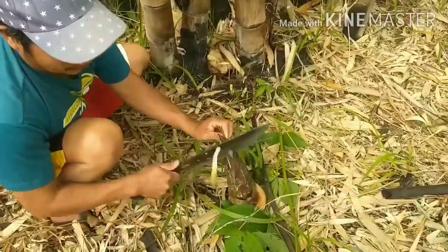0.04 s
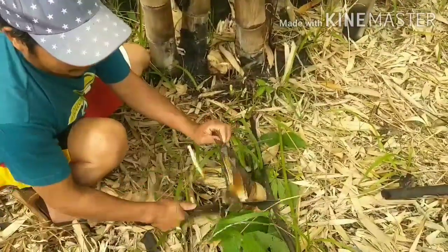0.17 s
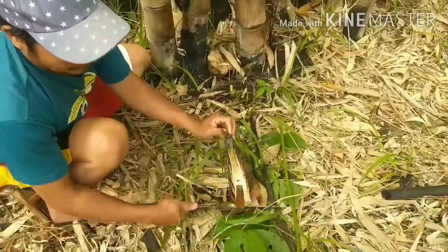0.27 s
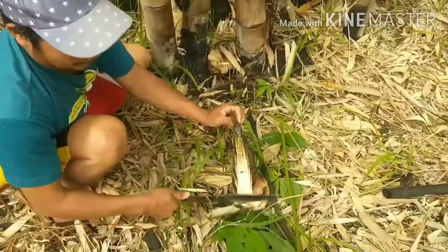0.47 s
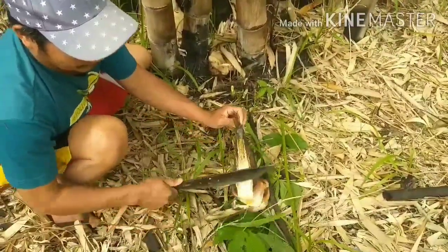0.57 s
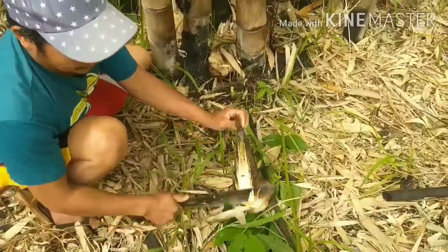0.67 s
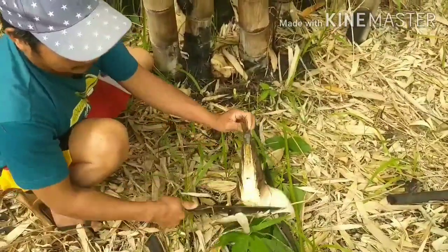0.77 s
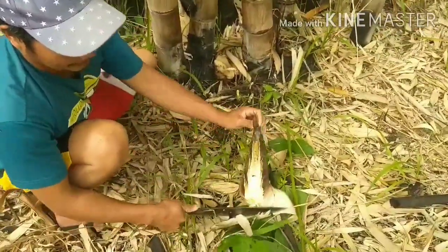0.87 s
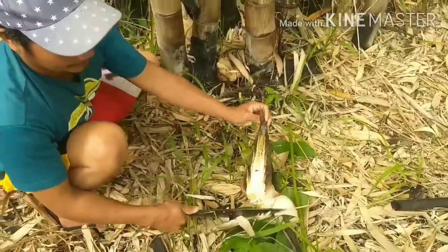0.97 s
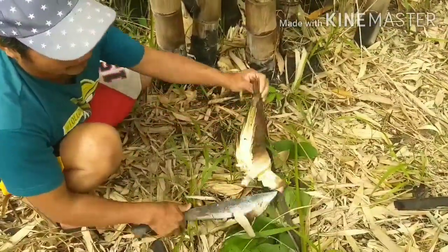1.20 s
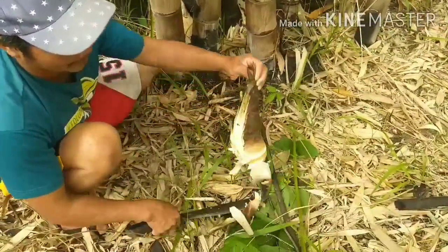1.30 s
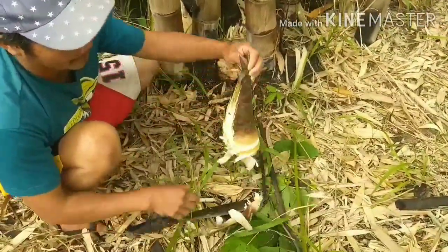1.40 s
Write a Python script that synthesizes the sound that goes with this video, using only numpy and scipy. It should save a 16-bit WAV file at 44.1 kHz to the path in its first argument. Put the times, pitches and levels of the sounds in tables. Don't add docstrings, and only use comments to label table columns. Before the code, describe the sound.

Close outdoor sound of a blade slicing a tough shoot, one loud crackling tear trailing into a shave, a quieter bright second cut, then sparse snaps and papery litter rustling over very faint air.

```python
import sys
import numpy as np
from scipy import signal
from scipy.fft import rfft, irfft, next_fast_len
from scipy.io import wavfile
from scipy.ndimage import uniform_filter1d, map_coordinates

SR = 44100
rng = np.random.default_rng(int(sys.argv[2]) if len(sys.argv) > 2 else 0)


def decibels_to_gain(level_db):
    exponent = np.asarray(level_db, float) / 20
    return 10 ** exponent


def persist_wave(psi):
    counts = np.round(np.clip(psi, -1, 1) * 32767).astype(np.int16)
    wavfile.write(sys.argv[1], SR, np.atleast_2d(counts).T)


N = 63945
TIME = np.arange(N) / SR


def unit(x):
    return x / np.sqrt(np.mean(x ** 2) + 1e-20)


def filtered(x, response):
    m = next_fast_len(N + 8192)
    hz = np.fft.rfftfreq(m, 1 / SR)
    return irfft(rfft(x, m) * response(hz), m)[..., :N]


def gain_curve(hz, points):
    point_hz, db = np.transpose(points)
    return decibels_to_gain(np.interp(np.log(hz + 1), np.log(point_hz + 1), db))


def coloured(x, points):
    return unit(filtered(x, lambda hz: gain_curve(hz, points)))


def peak(f, hz, width_hz):
    return width_hz * 1j * f / (hz * hz - f * f + 1j * f * width_hz)


def wobble(rate_hz):
    knots = rng.standard_normal(int(N / SR * 400) + 4)
    return map_coordinates(knots, [TIME * rate_hz])


def crackle(clump_db, patchy_db):
    grains_per_s, spike_db, biggest_db, grain_share = 6000, 3, 11.5, 0.53
    chance, sign, size = rng.random((3, N))
    size_db = np.minimum(-spike_db * np.log(size + 1e-9), biggest_db)
    breaks = (chance < grains_per_s / SR) * np.sign(sign - 0.5) * decibels_to_gain(size_db)
    hiss = rng.standard_normal(N)
    x = np.sqrt(grain_share) * unit(breaks) + np.sqrt(1 - grain_share) * hiss
    z = signal.stft(x, nperseg=128)[2]
    patches = uniform_filter1d(rng.standard_normal(z.shape), size=4, axis=0)
    patches = uniform_filter1d(patches, size=4, axis=1)
    x = signal.istft(z * decibels_to_gain(patchy_db * unit(patches)), nperseg=128)[1][:N]
    return unit(x * decibels_to_gain(clump_db * (wobble(60.99) + wobble(250))))


def place(out, s, sound):
    return out + np.pad(sound, (round(s * SR), N))[:N]


# (time [s], effort [dB], depth of cut [dB over effort], brightness [dB over effort])
PLACING = [
    (0, -47.5, -15, 3),
    (0.044, -44.5, -19.5, 0),
    (0.068, -44, -11, -10),
    (.1, -48, -23, 7),
    (.125, -54.5, -22, 17),
    (.135, -56.5, -13, 3),
    (.165, -53.5, -25, 17),
    (.192, -42, -21.5, 0.5),
    (0.204, -33, -15, 8.5),
]
CUT_1 = [
    (0.207, -15.5, -40, 10.5),
    (0.211, -8.5, -39.5, -18),
    (0.227, -13, -12.5, 5),
    (0.238, -16.5, -29, 1.5),
    (0.243, -21.5, -5.5, 1),
    (0.268, -19, -17, -12),
    (0.309, -28.5, -13.5, -3),
    (.41, -28.5, -15, 2.5),
    (0.427, -38, -15.5, 5),
]
RETURN = [
    (.448, -31.5, -12.5, 0.018),
    (0.461, -39.5, -19, 0.53),
    (.53, -39, -16.5, 0.038),
    (.6, -42, -24, 1),
    (.64, -42.5, -41, -1.6),
    (.667, -48.5, -34, -2),
    (.674, -44, -34, -1),
]
CUT_2 = [
    (.677, -33, -45, -8.5),
    (0.692, -34.5, -37.5, 1),
    (0.694, -26, -50, -4),
    (.72, -23.5, -27, 10),
    (.745, -25, -24.5, 1.5),
    (0.759, -26.5, -6, 9),
    (.763, -29, -10.5, 5),
    (0.789, -27.5, -13.5, -2.5),
    (.83, -29.5, -21.5, -5),
]
LIFTING = [
    (.89, -38, -14.5, 1.5),
    (.97, -42, -20.5, -5),
    (1.05, -41, -15, 3.5),
    (1.15, -44.5, -24.5, 2.5),
    (1.243, -44, -17, 4),
    (1.257, -38, -24, 8.5),
    (1.29, -41, -15.5, 2),
    (1.329, -33.5, -16.5, 3),
    (1.385, -35, -20.5, 6),
    (1.45, -42.5, -17, 4.5),
]


def controls():
    s, *columns = np.transpose(PLACING + CUT_1 + RETURN + CUT_2 + LIFTING)
    return [np.interp(TIME, s, column) for column in columns]


# (frequency [Hz], level [dB per Hz])
FIBRE_COLOUR = [(500, -37), (1200, -16.5), (2300, -5.5), (3600, 1.5), (4900, 3), (6200, -10), (16000, -23)]
# (frequency [Hz], level [dB per Hz])
FIZZ_COLOUR = [(3000, -43), (6200, -17), (8000, 3), (9300, -0.5), (10200, -10), (12000, 4), (13500, -9.5),
               (15700, -9.5)]
# (frequency [Hz], level [dB per Hz])
FLESH_COLOUR = [(40, -40), (90, -18), (250, -16), (500, -13.5), (900, -1.5), (1900, -1.5), (3000, -12)]


def tearing():
    effort_db, depth_db, bright_db = controls()
    fibres = crackle(clump_db=0.0, patchy_db=2.0)
    rasp = decibels_to_gain(-6.0) * coloured(fibres, FIBRE_COLOUR)
    fizz = decibels_to_gain(bright_db - 8.5) * coloured(fibres, FIZZ_COLOUR)
    flesh = decibels_to_gain(depth_db) * coloured(crackle(clump_db=1.2, patchy_db=1.2), FLESH_COLOUR)
    return decibels_to_gain(effort_db) * (rasp + fizz + flesh)


# (time [s], peak level [dB], pitch [Hz], decay t60 [s])
STRAND_BREAKS = [(0.0542, -19, 7500, 0.015), (0.0545, -18, 3650, 0.0118), (0.054, -33, 2450, 0.017),
                 (0.068, -39, 4800, .02), (.044, -51, 2900, 0.0182), (0.2008, -22, 8700, .01),
                 (.2053, -22, 7800, .01), (0.208, -11, 11800, 0.017), (.2215, -7.5, 11820, .015),
                 (0.2085, -4.5, 8200, 0.011), (0.2109, -5.5, 4200, 0.014), (.2135, -4.5, 3480, 0.01),
                 (0.2152, -7, 3000, 0.013), (0.221, -4, 3100, 0.0087), (0.2236, -14, 1900, 0.0084),
                 (.2245, -8.5, 3500, 0.028), (.2305, -24, 4600, .012), (.2365, -17.5, 2600, 0.0066),
                 (.249, -22.5, 2100, 0.0092), (.263, -20, 3300, 0.022), (0.4419, -17.5, 3573, 0.0071),
                 (.507, -31.5, 9300, 0.0165), (.619, -34, 3360, .006), (0.6764, -25.5, 3290, 0.022),
                 (.6935, -21, 3600, 0.015), (.6985, -15.5, 9100, .012), (0.6998, -31, 3300, 0.0107),
                 (0.7032, -19, 3300, 0.014), (.712, -16, 7580, 0.0246), (0.76, -13.5, 3350, 0.021),
                 (0.7186, -13, 10500, .003), (0.7198, -20, 3900, 0.0088), (0.7241, -13, 7580, .02),
                 (0.7563, -21.5, 2072, 0.016), (0.736, -26, 3200, 0.01), (0.7513, -20, 3600, 0.023),
                 (.823, -27, 4720, 0.0156), (.905, -25, 8260, 0.0049), (1.171, -38.5, 3800, .015),
                 (1.2545, -36, 9000, 0.0071), (1.259, -38, 12000, .004), (1.273, -28.5, 9200, .006),
                 (1.315, -29, 4000, .005), (1.354, -31, 4600, .008), (1.36, -28, 4400, 0.0047),
                 (1.382, -26, 3800, 0.009)]


def strands():
    rise_s, width_over_pitch = 0.00037, 0.063
    out, t = np.zeros(N), np.arange(SR // 20) / SR
    f = np.fft.rfftfreq(len(t), 1 / SR)
    for s, db, hz, t60 in STRAND_BREAKS:
        clicks = rfft(rng.standard_normal(len(t)))
        rough = unit(irfft(clicks * peak(f, hz, width_over_pitch * hz), len(t)))
        tone = np.cos(2 * np.pi * hz * t) + 0.7 * rough
        sound = tone * decibels_to_gain(-60 * t / t60) * (1 - np.exp(-t / rise_s))
        out = place(out, s, decibels_to_gain(db) * sound / np.abs(sound).max())
    return filtered(out, lambda hz: np.minimum(hz / 1600, 1) ** 3)


# (time [s], peak level [dB], pitch [Hz], decay t60 [s])
FIBRE_SNAPS = [(.009, -37.5, 4520, 0.0176), (.024, -40, 3500, 0.025), (.054, -17.5, 4510, 0.016),
               (0.0563, -29.5, 7300, 0.0076), (0.0547, -30, 880, .012), (0.194, -33.5, 4500, 0.0107),
               (.201, -24.5, 8200, 0.014), (0.2935, -15.5, 4640, 0.044), (0.328, -23, 1940, 0.0105),
               (.361, -19, 4870, 0.017), (.389, -24.5, 5240, 0.016), (0.4055, -19, 8900, 0.0038),
               (0.434, -25.5, 1650, 0.032), (0.4425, -25.5, 3550, 0.014), (.507, -30.5, 9400, 0.027),
               (.521, -30, 8400, 0.0068), (.559, -26.5, 7750, 0.0087), (.597, -30, 11700, 0.0034),
               (0.62, -36, 3360, 0.0039), (.676, -35, 3380, 0.026), (0.756, -21, 3250, 0.013),
               (.76, -14, 3050, 0.01), (.825, -28.5, 1580, 0.024), (0.904, -31, 4330, 0.014),
               (.954, -31, 4930, 0.0033), (0.993, -28, 4720, 0.01), (.996, -27.5, 8274, 0.013),
               (1.325, -29.5, 8900, 0.0058), (1.38, -23.5, 8060, 0.034), (1.42, -22.5, 10900, 0.0035)]
# (frequency [Hz], level [dB])
CLICK_COLOUR = [(400, -30), (1500, -7), (3600, 0), (5000, -2), (6200, -9), (8000, -3), (12000, -6),
                (15600, -12)]


def snaps():
    lead = 44
    out, t = np.zeros(N), np.arange(SR // 20) / SR
    f = np.fft.rfftfreq(len(t), 1 / SR)
    mic = gain_curve(f, CLICK_COLOUR)
    for s, db, hz, t60 in FIBRE_SNAPS:
        burst = np.roll(rng.standard_normal(len(t)) * decibels_to_gain(-60 * t / t60), lead)
        colour = mic * (peak(f, hz, 0.35 * hz) + 0.2)
        burst = irfft(rfft(burst) * colour, len(t)) * (t < t[-1] / 2)
        out = place(out, s - lead / SR, decibels_to_gain(db + 2) * burst / np.abs(burst).max())
    return out


# (frequency [Hz], level [dB])
BLADE_MODES = [(4770, -34.5), (7585, 0), (9240, -0.5), (10860, -12), (12500, -33)]
# (time [s], level [dB], mode struck best [Hz], decay t60 [s])
BLADE_TOUCHES = [(.023, -31.5, 7585, 0.068), (.035, -44, 12500, .16), (.034, -52, 10860, .12),
                 (0.055, -42, 9240, .1), (.056, -33.5, 7585, 0.072), (.098, -39.5, 9240, 0.085),
                 (.103, -43, 7585, 0.099), (.108, -43, 12500, 0.079), (.158, -50, 7585, 0.09),
                 (.571, -42, 7585, 0.1), (.603, -37.5, 7585, .08), (.604, -42, 10860, 0.076),
                 (.62, -35, 9240, 0.18), (.638, -49, 7585, 0.135), (.669, -40, 9240, .1),
                 (.674, -40.5, 10860, 0.087)]


def blade_touches():
    other_modes_db, rise_s = -14, 0.0028
    out, t = np.zeros(N), np.arange(SR // 4) / SR
    for s, db, best_hz, t60 in BLADE_TOUCHES:
        ring = np.zeros(len(t))
        for hz, level in BLADE_MODES:
            struck_best = abs(hz / best_hz - 1) < 0.07
            mode_db = 0 if struck_best else level + other_modes_db
            ring += decibels_to_gain(mode_db) * np.sin(2 * np.pi * hz * t + rng.random() * 2 * np.pi)
        decay = decibels_to_gain(db - 60 * t / t60 + 3.26 * wobble(110.7)[:len(t)])
        out = place(out, s, decay * ring * (1 - np.exp(-t / rise_s)))
    return out


# (start [s], end [s], ringing [dB over effort], bite [dB over effort],
# bite start [Hz], bite end [Hz])
EDGE_BITES = [
    (0.198, 0.239, -8.5, -8, 4220, 2370),
    (0.664, 0.777, -5, -6.5, 3350, 3400),
]
# (frequency [Hz], level [dB])
DRAG_RING_COLOUR = [(2000, -40), (4000, 0)]


def edge_bite():
    held_t60, bite_width_hz = 0.022, 1100
    t = np.arange(SR // 4) / SR
    out, drag = np.zeros(N), crackle(clump_db=0.85, patchy_db=2.5)
    modes = sum(decibels_to_gain(level - 60 * t / held_t60) * np.sin(2 * np.pi * hz * t) for hz, level in BLADE_MODES)
    ring = coloured(signal.fftconvolve(drag, modes)[:N], DRAG_RING_COLOUR)
    effort = decibels_to_gain(controls()[0])
    for start, end, ring_db, bite_db, from_hz, to_hz in EDGE_BITES:
        first = unit(filtered(drag, lambda f: peak(f, from_hz, bite_width_hz) ** 2))
        last = unit(filtered(drag, lambda f: peak(f, to_hz, bite_width_hz) ** 2))
        turn = np.clip((TIME - start) / (end - start), 0, 1) * np.pi / 2
        bite = np.cos(turn) * first + np.sin(turn) * last
        inside = uniform_filter1d(1.0 * ((TIME > start) & (TIME < end)), size=200)
        out += inside * effort * (decibels_to_gain(ring_db) * ring + decibels_to_gain(bite_db) * bite)
    return out


# (time [s], level [dB over effort])
LITTER_LEVEL = [
    (0, -10),
    (.2, -12),
    (.25, -9.5),
    (.45, -10),
    (.66, -15),
    (.78, -12),
    (.9, -6.5),
    (1.24, -6),
    (1.27, -0.5),
    (1.45, -4.5),
]
# (frequency [Hz], level [dB per Hz])
LEAF_COLOUR = [(800, -31.5), (2000, -11.5), (4500, -1), (5800, -1.5), (7000, -2), (10200, -3.5),
               (13500, -2.5), (15700, -5.5)]


def litter():
    s, db = np.transpose(LITTER_LEVEL)
    level_db = controls()[0] + np.interp(TIME, s, db)
    return decibels_to_gain(level_db) * coloured(crackle(clump_db=2.0, patchy_db=3.5), LEAF_COLOUR)


# (time [s], level [dB], pitch [Hz], decay t60 [s])
GROUND_PUSHES = [
    (0.223, -49, 113, 0.161),
    (0.237, -48, 299.6, 0.279),
    (.75, -63, 100, 0.15),
    (.775, -53.5, 348, 0.19),
    (1.319, -75.5, 65, 0.433),
]


def thuds():
    out, t = np.zeros(N), np.arange(SR // 5) / SR
    for s, db, hz, t60 in GROUND_PUSHES:
        dull = unit(filtered(rng.standard_normal(N), lambda f: peak(f, hz, 1.61 * hz) ** 2))[:len(t)]
        swell = 1 - np.exp(-t / 0.0063)
        out = place(out, s, decibels_to_gain(db + 9.5 - 60 * t / t60) * dull * swell)
    return out


# (frequency [Hz], level [dB per Hz])
AIR_COLOUR = [(18, -44), (30, -13), (124, 4.5), (161, -1.5), (188, -3.5), (590, -26), (1200, -19),
              (1560, -37), (2640, -120)]


def air():
    return decibels_to_gain(-75 + 1.8 * wobble(9.8)) * coloured(rng.standard_normal(N), AIR_COLOUR)


# (centre [Hz], width [Hz], level [dB], louder side [signed gain])
PORT_BANDS = [(1894, 420, -8.5, 0.756), (9630, 1680, -16, -1.19)]


def two_ports(mid):
    stray_colour = [(1000, 3), (3500, -14), (16000, 1)]  # (frequency [Hz], level [dB])
    stray = decibels_to_gain(controls()[0]) * coloured(rng.standard_normal(N), stray_colour)

    def apart(f):
        return sum(lean * decibels_to_gain(db) * np.exp(-((f - hz) / width * 2) ** 4) for hz, width, db, lean in PORT_BANDS)

    side = filtered(mid + 0.7 * stray, apart)
    return np.array([mid + side, mid - side])


def scene():
    cut = tearing() + strands() + snaps()
    steel = blade_touches() + edge_bite()
    return two_ports(cut + steel + litter() + thuds() + air())


def top_cut(x):
    return signal.sosfilt(signal.butter(12, 16650, fs=SR, output="sos"), x)


def record(dry):
    held = dry / (1 + np.abs(dry / 0.9) ** 4) ** (1 / 4)
    mix = filtered(held, lambda hz: (hz < 15550) * np.minimum(hz / 55, 1) ** 2)
    return top_cut(mix)


dry = scene()
out = record(dry)
persist_wave(out)
```